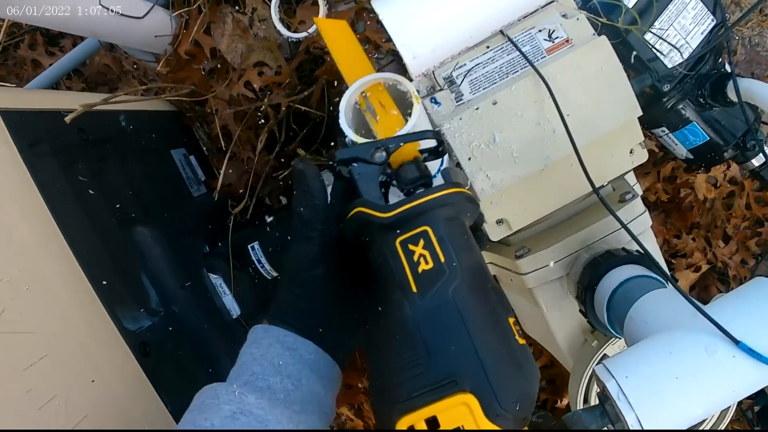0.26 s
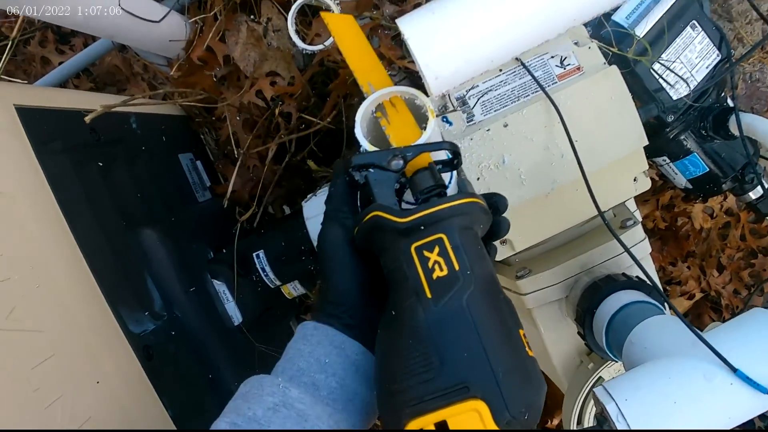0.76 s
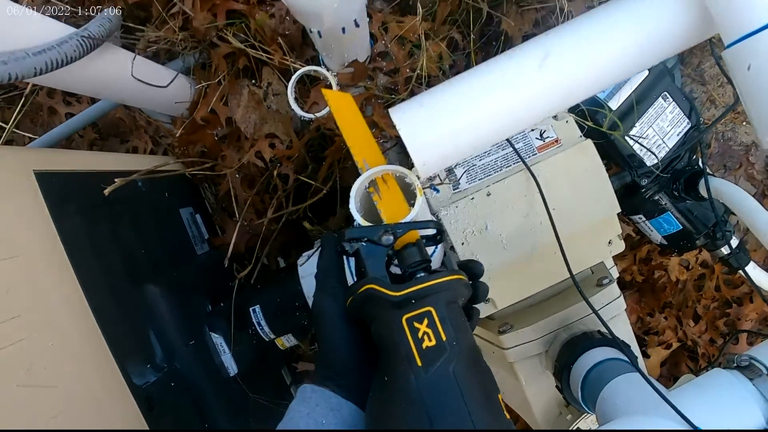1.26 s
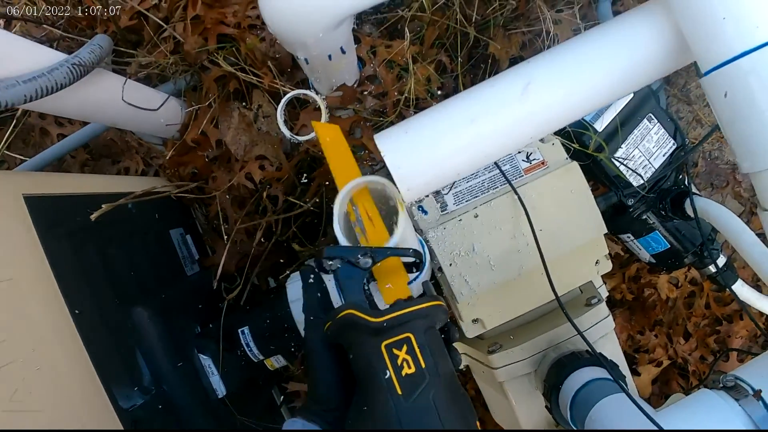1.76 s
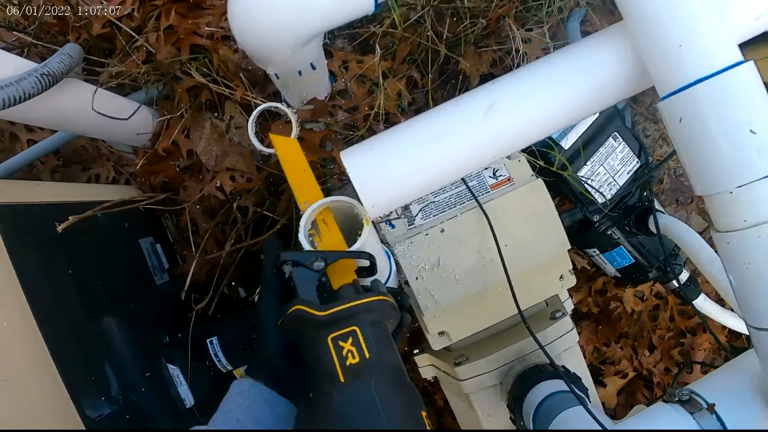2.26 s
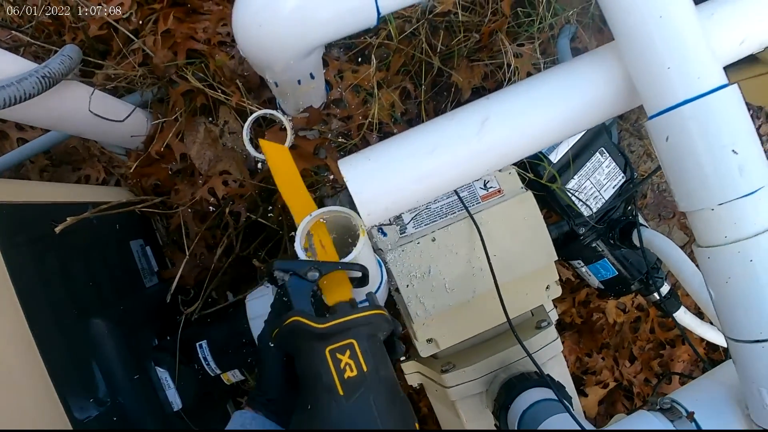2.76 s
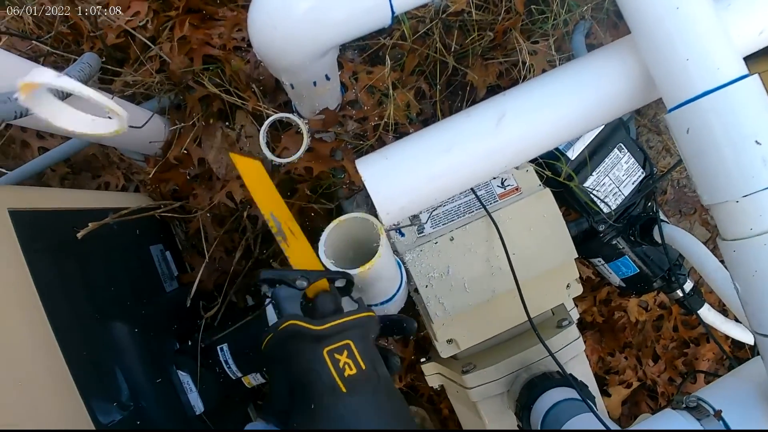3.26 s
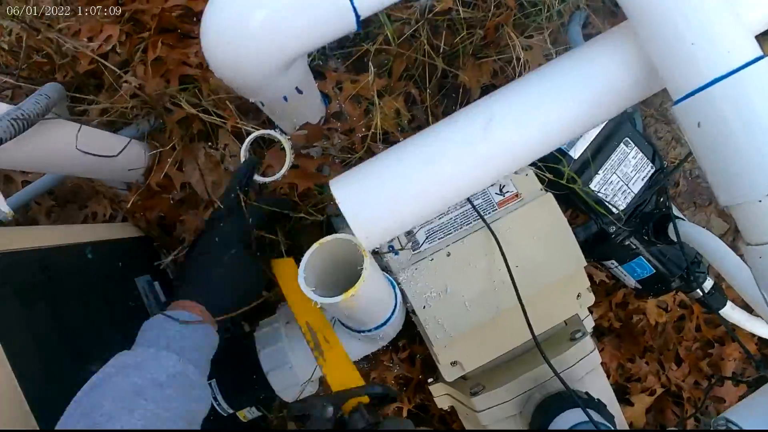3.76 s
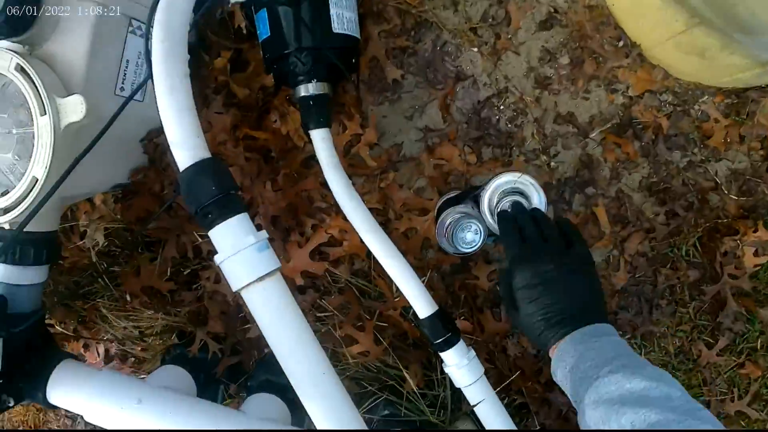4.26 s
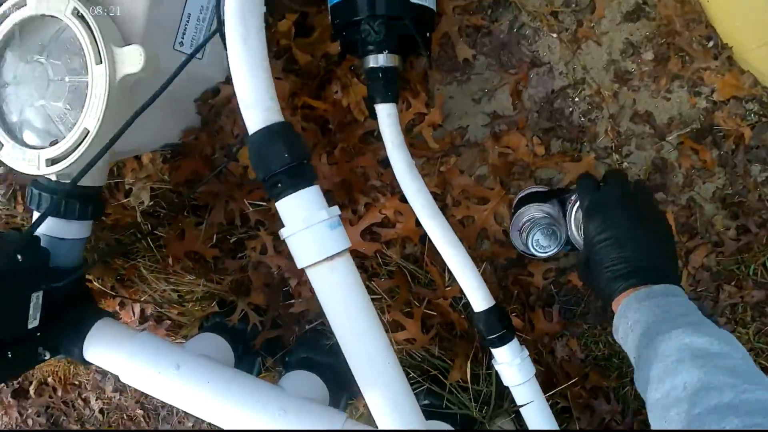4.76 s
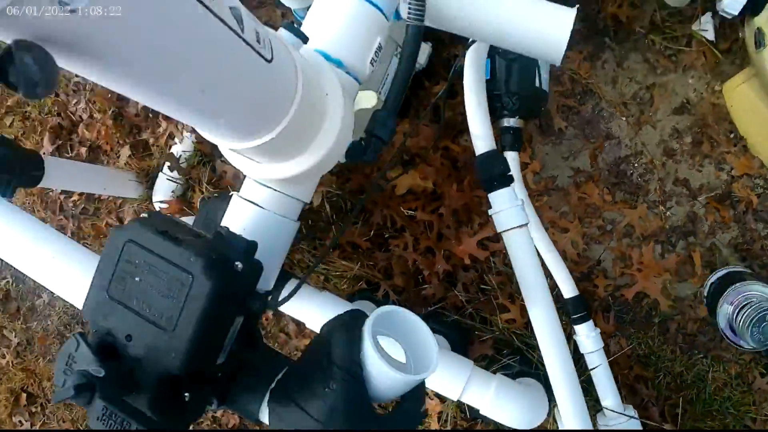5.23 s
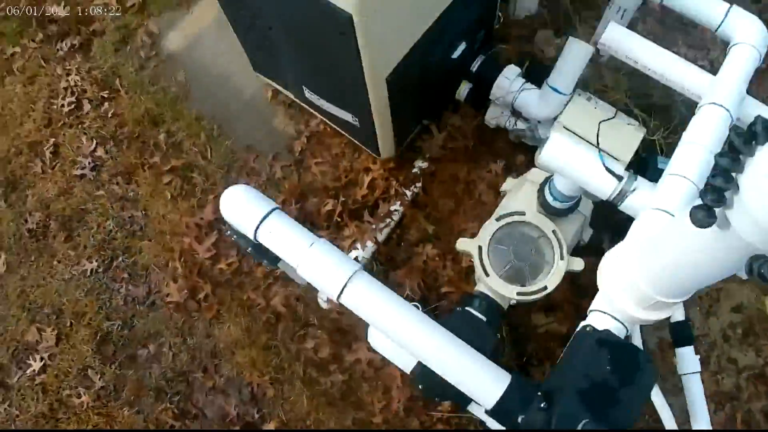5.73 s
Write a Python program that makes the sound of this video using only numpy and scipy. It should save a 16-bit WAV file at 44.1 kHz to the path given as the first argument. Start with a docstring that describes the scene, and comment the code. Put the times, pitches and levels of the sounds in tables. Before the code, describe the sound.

Close outdoor pickup of a cordless reciprocating saw on plastic pipe. It buzzes already running, winds down with clicks and taps, pauses, then cuts in two loud rattling bursts. The freed blade whines and spins down. Quiet air, faint leaf rustle and low microphone bumps follow, ending in a hollow plastic thump.

```python
"""A cordless reciprocating saw, close by outdoors, works through an upright plastic pipe.
One crank angle times the blade, gears and carrier: coloured noise for cutting, tones for whine, hum and motor.
The saw skims and stops, is set down again, bites and slams the pipe at each reversal, breaks through, spins down.
Noise bursts and decaying modes make scrapes, taps and a late hollow thump; noise swells make low bumps and slides.
Rumble, a distant hush and a faint rustle of leaves lie beneath, and nearby surfaces return a short, dull echo."""
import sys
import numpy as np
from scipy import signal
from scipy.fft import rfft, irfft, next_fast_len
from scipy.io import wavfile
from scipy.ndimage import uniform_filter1d

SR = 44100
rng = np.random.default_rng(int(sys.argv[2]) if len(sys.argv) > 2 else 0)


def output_pcm(signal):
    """Save a mono or channel-first signal as 16-bit PCM at the path in sys.argv[1].

    Samples are clipped to [-1, 1] before scaling.
    """
    pcm = np.clip(np.atleast_2d(signal).T, -1, 1) * 32767
    wavfile.write(sys.argv[1], SR, np.round(pcm).astype(np.int16))


N = 264417
T = np.arange(N) / SR
SIZE = next_fast_len(N + SR // 2)
HZ = np.maximum(np.arange(SIZE // 2 + 1) * SR / SIZE, 1)

# All levels are relative: filters and the mix scale them further.
# crank speed in each of three runs: (time [s], speed [strokes per s])
CRANK_SPEED = [
    [(0, 25.6), (.34, 25.4), (.47, 26.1), (.55, 25.4), (.6, 19), (.7, 12)],
    [(1.65, 4), (1.77, 17.08), (1.89, 15.75), (1.97, 23.02), (2.08, 24.27), (2.42, 24.85), (2.52, 10.9)],
    [(2.67, 4), (2.78, 7.24), (2.88, 16.78), (2.95, 22.62), (3.1, 25.2), (3.46, 25.1), (3.53, 26.7),
     (3.72, 26.7), (3.75, 20.6), (3.8, 19), (3.89, 11)],
]
# a moment in each run at which the blade starts to pull: time [s]
PULL_START = [0, 1.8044, 2.779]
# blade skimming the pipe: (time [s], level [dB])
SKIM_LEVEL = [(0.0, -23), (0.364, -23.5), (0.686, -35.5), (0.74, -97)]
# cutting effort in each of two deep cuts: (time [s], level [dB])
CUT_EFFORT = [
    [(1.66, -54), (1.8, -25), (1.97, -15), (2.08, -18), (2.33, -15.5), (2.42, -22), (2.485, -19),
     (2.55, -50)],
    [(2.66, -53), (2.78, -23), (2.945, -17), (2.972, -25), (3.0, -19.5), (3.16, -18.5), (3.3, -20),
     (3.47, -18), (3.5, -27.5)],
]
# blade running free: (time [s], level [dB])
FREE_LEVEL = [(3.48, -13), (3.492, -22), (3.716, -22.5), (3.85, -31), (3.866, -24), (3.884, -31),
              (3.93, -104.5)]
# gear whine under light load: (start [s], end [s], level at top speed [dB], roughness [0-1])
GEAR_WHINE = [(0, .69, -32, 0.2), (3.098, 3.49, -36.5, .55), (3.496, 3.723, -27.5, .05),
              (3.745, 3.887, -28.5, .3)]
# hum of the blade carrier: (multiple of stroke rate [1], level [dB])
CARRIER_HUM = [(2, -20.5), (3, -31.5), (6, -23.5), (10, -17), (14, -18.5), (17, -15.5)]
# motor tone in each run: (time [s], frequency [Hz], level [dB])
MOTOR_TONE = [
    [(1.76, 6200, -60), (1.785, 7200, -43), (1.82, 9000, -52)],
    [(2.715, 6300, -58), (2.745, 7700, -51), (2.775, 9100, -40)],
    [(3.48, 7300, -48), (3.54, 7440, -41), (3.69, 7500, -42), (3.74, 6800, -46), (3.77, 6280, -32.5),
     (3.81, 5960, -48)],
]
# slow or still blade scraping in the cut: (time [s], level [dB], amplitude decay [s])
BLADE_SCRAPES = [(0.678, -29, 0.0079), (0.761, -22, 0.006), (0.802, -33, 0.011), (0.842, -29, 0.01),
                 (0.86, -23.5, 0.0087), (1.435, -57.5, 0.032), (1.641, -39, 0.012), (1.722, -31.5, 0.038),
                 (2.666, -39.5, .005), (2.682, -35.5, 0.019), (2.729, -29, .0055), (2.827, -11.5, 0.0047),
                 (2.868, -15.5, .005), (3.965, -48.5, 0.013)]
# taps and clicks that ring the pipe: (time [s], wall level [dB], air column level [dB])
SHOE_TAPS = [(.764, -34.5, -39), (.844, -24, -37), (.874, -10.5, -30.5), (.922, -24, -35),
             (.951, -32.5, -37.5), (1.130, -28.5, -46), (1.2565, -31, -54), (1.777, -9, -48.5),
             (2.548, -28.5, -35), (2.575, -22.5, -36.5), (2.596, -25.5, -39.5), (2.766, -18.5, -46.5),
             (2.83, -10, -43.5), (2.869, -15, -45.5)]
# modes of the pipe wall: (frequency [Hz], level [dB], t60 [s])
WALL_MODES = [(728, -2, 0.022), (900, -6.5, 0.029), (1240, -2.5, 0.012), (1594, -3.5, 0.013),
              (1720, -3.5, 0.0087), (3180, -28.5, 0.0049)]
# modes of the air column: (frequency [Hz], level [dB], t60 [s])
COLUMN_MODES = [(287, 1, 0.04), (557, 1, 0.079)]
# dull low bumps, mostly wind and handling on the microphone, at 1.966 s a low thud of the slamming saw: (time
# [s], level [dB], Gaussian spread [s])
LOW_BUMPS = [(.85, -44, 0.075), (1.17, -49, 0.0096), (1.966, -33, 0.05), (4.08, -50, 0.022),
             (4.168, -41.5, 0.027), (4.3, -50, 0.081), (4.575, -42.5, .014), (4.828, -40.5, 0.0098),
             (4.917, -39.5, 0.054), (5.139, -46, .042), (5.48, -41, .024), (5.572, -44, 0.067)]
# gloved hand sliding the fittings: (time [s], level [dB], Gaussian spread [s])
HAND_SLIDES = [(4.419, -65, 0.011), (4.647, -77.5, 0.19), (5.014, -51.5, 0.0086)]
# modes of the hollow body: (frequency [Hz], level [dB], t60 [s])
HOLLOW_MODES = [(147.4, -3.5, 0.2), (276, -5.5, 0.11), (349, -9, 0.16), (386, -4, 0.12), (573, -3.5, 0.02),
                (724, -6, 0.053), (900, -5, 0.011), (1324, -19, 0.063), (1660, -24, 0.056)]
# hush and leaf rustle outdoors, two stretches: (time [s], hush [dB], rustle [dB])
OUTDOOR_AIR = [
    [(0.98, -68, -86), (1.21, -69.5, -94), (1.428, -66, -89), (1.6, -64.5, -87)],
    [(3.95, -61.5, -75.5), (4.078, -54.5, -91), (4.772, -54.5, -84.5), (5.88, -52.5, -77)],
]
# low rumble of air on the microphone: (time [s], level [dB])
RUMBLE_LEVEL = [(1, -53.5), (1.6, -59), (4.1, -54), (5.9, -50)]

# noise spectra, rescaled to unit power: (frequency [Hz], density [dB per Hz])
SKIM_SPECTRUM = [(24, -28), (40, -11), (124, -18.5), (422, -2.5), (479, -6.5), (1020, -14), (1210, -4),
                 (2770, -10.5), (3300, -4), (3830, -17.5), (7540, -14.5), (8990, -13), (10700, -21),
                 (14100, -22), (16000, -36)]
CUT_SPECTRUM = [(35, -64), (60, -26.5), (133, -8.5), (172, -23), (217, -3), (437, -2), (607, -7.5),
                (1510, 1), (2710, -16), (4750, -19), (7570, -14), (8320, -17.5), (9790, -24),
                (11300, -32.5), (16000, -38.5)]
SLAM_SPECTRUM = [(35, -54.5), (60, -44.5), (172, -17), (217, -9), (448, -12), (607, -14), (1250, -1),
                 (1950, -5.5), (2710, -16), (4220, -17.5), (7570, -14), (8320, -15.5), (9790, -22),
                 (11300, -32.5), (16000, -48.5)]
FREE_SPECTRUM = [(24, -30.5), (40, -11.5), (185, -16.5), (479, -8), (715, -10), (942, 1.5), (1340, 2),
                 (2910, -15.5), (3380, -7.5), (3740, -15), (6170, -10.5), (8550, -11), (11300, -29),
                 (13800, -26), (16000, -48.5)]
SCRAPE_SPECTRUM = [(200, 2), (1000, 7.5), (3500, -3.5), (6000, -5), (9500, -8), (11500, -17.5),
                   (16000, -21)]
BUMP_SPECTRUM = [(10, -25), (30, -11.5), (55, 1), (90, 1), (200, -2), (350, -13), (600, -22.5),
                 (2000, -51.5), (8000, -84.5), (16000, -80)]
SLIDE_SPECTRUM = [(1000, -23), (2800, -16), (4000, 2), (6500, -7), (9500, -3), (13500, -5), (16000, -6.5)]
CRACK_SPECTRUM = [(200, 4), (1000, 5.5), (2300, -10), (3500, 4), (5700, -5), (8000, -10.5), (11000, -7),
                  (16000, -26)]
CLATTER_SPECTRUM = [(40, -21.5), (130, 1.5), (300, -5.5), (650, -8), (1000, -20.5), (1700, -25.5),
                    (3500, -30.5), (7000, -38), (16000, -56.5)]
RUMBLE_SPECTRUM = [(10, -40.5), (28, -18.0), (55, 6.5), (110, -3.0), (250, -10.5), (1000, -41.0),
                   (16000, -100)]
HUSH_SPECTRUM = [(60, -9.5), (300, -3.0), (900, -1.5), (1700, -10.0), (2600, -28.0), (6000, -53),
                 (16000, -71.0)]
RUSTLE_SPECTRUM = [(800, -22.5), (2500, -7.5), (3900, -2.5), (5400, -7.0), (9500, -6.5),
                   (11300, -15.5), (13500, -8.0), (16000, -19)]
# narrow peaks of saw and pipe, and dips of the microphone: (frequency [Hz], width [Hz], level [dB])
PEAKS_AND_DIPS = [(452, 23, 4.5), (1320, 79, 2), (1490, 140, 3), (1720, 43, 0), (1880, 130, 1),
                  (2970, 160, -1), (4120, 200, 3.5), (4900, 480, 4), (5387, 220, -6.5), (6090, 200, 2.5),
                  (7665, 460, -6), (8270, 180, 4), (9500, 700, 3), (11100, 730, -8.5)]
# response of the gear housing: (frequency [Hz], level [dB])
HOUSING_RESPONSE = [(1200, -23), (1900, 0.5), (2250, -11.5), (2480, 4.5), (2800, -15.5), (3150, 1.5),
                    (3350, -0.5), (3550, -2.5), (3900, -18.5), (7000, -7), (10000, -18.5)]
# left minus right for saw and pipe: (frequency [Hz], level [dB])
SAW_LEAN = [(60, -5.5), (250, 4), (600, 7), (1200, 6), (2200, 3), (4200, 8), (8000, 14.5), (12000, -3)]
# left-right correlation, before limiting, while skimming: (frequency [Hz], correlation [1])
SKIM_CORRELATION = [(60, -0.18), (350, -0.63), (600, -1), (900, -0.37), (1200, -1.1), (1650, -2.5),
                    (2400, 1), (3800, -0.67), (8000, 0.98), (10800, -1.5), (13000, .85)]
# and for all other contacts of saw and pipe: (frequency [Hz], correlation [1])
CUT_CORRELATION = [(60, 0.37), (400, 0.67), (540, -0.13), (900, 0.54), (1400, 0.94), (2400, -0.78),
                   (4000, -0.38), (6000, 0.68), (8500, 0.23), (10800, -.5), (13000, .85)]

GEAR_TEETH = 131  # whine cycles per crank turn
WHINE_DB_PER_OCTAVE = 6  # the whine sinks with the crank speed
BRAKING_PER_S2, BACKLASH = 70, 0.97  # full braking (strokes per s lost each s) and roughness it adds
RIPPLE_DB, RIPPLE_HZ = 4, 59.97  # depth and spacing of the small modes of blade and housing
TEETH_DB, SLAM_DB = -5.5, 10.5  # relative to the effort
PULL_DB, SLAM_SPREAD_DB = 2.5, 1.34  # lead of pull over push; chance range either way
SLAM_DB_PER_OCTAVE = 2  # a faster blade slams harder
TICK_DB, TICK_S = -20, 0.002  # bright tick relative to its tap, and its decay
THUMP_S, THUMP_DB = 5.9135, -13
GUST_DB, GUSTS_PER_S = 1.8, 4.5


def from_db(db):
    """Logarithmic level: decibels become an amplitude ratio."""
    return 10 ** (np.asarray(db) / 20)


def rms_one(x):
    """Power normalisation: scale to unit mean square."""
    return x / np.sqrt(np.mean(x ** 2) + 1e-20)


def in_time(rows):
    """Linear interpolation: a curve at every sample."""
    return np.interp(T, *np.transpose(rows))


def level(rows):
    """Envelope: smoothed gain from a dB curve, practically silent outside it."""
    db = np.interp(T, *np.transpose(rows), left=-140, right=-140)
    return uniform_filter1d(from_db(db), size=200)


def at_hz(points):
    """Logarithmic frequency interpolation: a curve at every spectral bin."""
    hz, value = np.transpose(points)
    return np.interp(np.log(HZ), np.log(hz), value)


def colour(x, db):
    """Minimum-phase filtering: causal colour that keeps the power of white noise."""
    cepstrum = irfft(np.log(rms_one(from_db(db))), SIZE)
    # folding the cepstrum onto positive time makes the response causal
    cepstrum[1:SIZE // 2] *= 2
    cepstrum[SIZE // 2 + 1:] = 0
    response = np.exp(rfft(cepstrum))
    return irfft(rfft(x, SIZE) * response, SIZE)[..., :N]


def noise():
    """Incoherence: two unrelated white noises."""
    return rng.standard_normal((2, N))


def drift(rate):
    """Random modulation: straight lines join chance values of unit spread, rate per second."""
    knots = rng.standard_normal(4000)
    return np.interp(T * rate, np.arange(len(knots)), knots)


def ring(clicks, modes, spread_db):
    """Modal superposition: clicks excite decaying resonances, each with a chance strength."""
    out, at = np.zeros(N), np.flatnonzero(clicks)
    for k, (hz, db, t60) in enumerate(modes):
        radius, angle = from_db(-60 / (t60 * SR)), 2 * np.pi * hz / SR
        force = np.full(N, 1e-18)  # inaudible floor
        force[at] = clicks[at] * from_db(db + spread_db * rng.standard_normal(len(at)))
        poles = [1, -2 * radius * np.cos(angle), radius * radius]
        out += (-1) ** k * signal.lfilter([0, np.sin(angle)], poles, force)
    return out


def add(track, s, gain, decay_s):
    """Exponential decay: add a sudden burst of power; decay_s is that of its amplitude."""
    i = int(s * SR)
    age = T[:min(N - i, SR // 4)]
    track[i:i + len(age)] += gain ** 2 * np.exp(-2 * age / decay_s)


def pair(x, alike, lean_db):
    """Stereo coherence: two noises become left and right; their middle keeps its power."""
    alike = np.clip(alike, -.9, .99)
    side, sign = np.sqrt((1 - alike) / (1 + alike)), np.array([[1], [-1]])
    lean = np.tanh(np.log(from_db(lean_db)) / 2)
    spread = x[0] + sign * side * x[1]
    return spread * (1 + sign * lean) / np.sqrt(1 + (side * lean) ** 2)


def crank():
    """Rotational kinematics: speed integrates to turns; whole turns start a pull, half turns a push."""
    speed = in_time(np.vstack(CRANK_SPEED))
    turns = np.cumsum(speed) / SR
    for run, pull_s in zip(CRANK_SPEED, PULL_START):
        turns = turns - np.interp(pull_s, T, turns) % 1 * (T >= run[0][0])
    return speed, turns


def drive(speed, turns, repeat, throb_db, grain_db):
    """Periodic contact: part of the noise returns each stroke; throb shapes its level after reversals."""
    stroke = rng.standard_normal((2, SR // 25))
    returning = stroke[:, (turns % 1 * stroke.shape[1]).astype(int)]
    contacts = np.sqrt(repeat) * returning + np.sqrt(1 - repeat) * noise()
    jolt = (speed / speed.max()) ** 2  # the blade's inertia force grows with the square of its speed
    swell_db = throb_db * jolt * (np.exp(-(2 * turns % 1) / 0.38) - .5)
    return rms_one(contacts * from_db(swell_db + grain_db * drift(900)))


def through_saw(force, tone, likeness, lean_db):
    """Transmission: saw, pipe and microphone colour a force, mostly stronger on the left."""
    body_db = sum(db * np.exp(-((HZ - hz) / width) ** 2) for hz, width, db in PEAKS_AND_DIPS)
    # countless small modes of blade and housing ripple the treble
    ripple = np.interp(HZ / RIPPLE_HZ, np.arange(1000), rng.standard_normal(1000))
    ripple = ripple * HZ / (HZ + 1200)
    coloured = colour(force, at_hz(tone) + body_db + RIPPLE_DB * ripple)
    sound = pair(rfft(coloured, SIZE), at_hz(likeness), at_hz(SAW_LEAN) + lean_db)
    return irfft(sound, SIZE)[:, :N]


def gears(speed, turns, flutter, octave_db, fringe_db, slip):
    """Gear meshing: tooth contacts whine through the housing; braking makes them chatter in backlash."""
    gain, rough = np.zeros((2, N))
    for start, end, db, roughness in GEAR_WHINE:
        during = (T >= start) & (T < end)
        gain[during], rough[during] = from_db(db), roughness
    braking = np.clip(-np.gradient(speed) * SR / BRAKING_PER_S2, 0, 1)
    gain, rough = uniform_filter1d([gain, rough + BACKLASH * braking], size=900)
    gain = gain * from_db(WHINE_DB_PER_OCTAVE * np.log2(speed / speed.max()))
    phase = 2 * np.pi * GEAR_TEETH * turns
    phase = phase + flutter * np.sin(4 * np.pi * turns) + slip * rough * drift(700)
    # random modulation widens the whine into a fringe
    fringe = from_db(fringe_db) * (drift(450) * np.sin(phase) + drift(450) * np.cos(phase))
    octave = from_db(octave_db) * np.sin(2 * phase)
    whine = gain * rms_one(np.sin(phase) + fringe + octave)
    housed = irfft(rfft(whine, SIZE) * from_db(at_hz(HOUSING_RESPONSE)), SIZE)[:N]
    return housed * from_db([[4], [-7]])


def shake(turns):
    """Harmonic radiation: the swinging blade carrier hums on multiples of the stroke rate."""
    hum = sum(from_db(db) * np.sin(2 * np.pi * (k * turns + rng.random())) for k, db in CARRIER_HUM)
    return level(SKIM_LEVEL) * hum * from_db([[1.5], [-1.5]])


def yard(x, echo_db, t60):
    """Diffuse reflection: pipes and housings nearby scatter a short, dull echo."""
    age = T[:SR // 2]
    scatter = rng.standard_normal((2, len(age))) * from_db(-60 * age / t60) * (age > .006)
    scatter = signal.sosfilt(signal.butter(1, 2500, fs=SR, output="sos"), scatter)
    scatter /= np.sqrt(np.sum(scatter ** 2, axis=1, keepdims=True))
    return x + from_db(echo_db) * signal.fftconvolve(x, scatter, axes=1)[:, :N]


def air(hush_db, rustle_db):
    """Broadband ambience: low rumble, a distant hush and a faint rustle of dry leaves."""
    s, *columns = np.vstack(OUTDOOR_AIR).T
    hush, rustle = [from_db(np.interp(T, s, db)) for db in columns]
    rumble = from_db(in_time(RUMBLE_LEVEL) + GUST_DB * drift(GUSTS_PER_S))
    rumble = rumble * colour(noise(), at_hz(RUMBLE_SPECTRUM))
    hush = hush * colour(noise(), at_hz(HUSH_SPECTRUM))
    rustle = rustle * colour(noise() * from_db(1.7 * drift(380)), at_hz(RUSTLE_SPECTRUM))
    return (pair(rumble, alike=.1, lean_db=2.0)
            + from_db(hush_db) * pair(hush, alike=-0.5, lean_db=3.0)
            + from_db(rustle_db) * pair(rustle, alike=.1, lean_db=4.5))


def handling(scrape_db, tap_db, tail_db):
    """Friction and impact: teeth scrape grittily; taps ring the pipe wall and the air in it."""
    power, wall, column = np.zeros((3, N))
    for s, db, decay_s in BLADE_SCRAPES:
        add(power, s, from_db(db + scrape_db), decay_s)
        add(power, s, from_db(db + tail_db), .03)  # faint longer tail
    for s, db, air_db in SHOE_TAPS:
        add(power, s, from_db(db + tap_db + TICK_DB), TICK_S)
        wall[int(s * SR)], column[int(s * SR)] = from_db([db + tap_db, air_db])
    envelope = np.sqrt(uniform_filter1d(power, size=90).clip(0))
    grit = envelope * noise() * from_db(7.2 * drift(1000))
    pipe = ring(wall, WALL_MODES, spread_db=3.0) + ring(column, COLUMN_MODES, spread_db=2.5)
    scraped = through_saw(grit, SCRAPE_SPECTRUM, CUT_CORRELATION, lean_db=-2)
    return scraped + pipe * from_db([[2], [-2]])


def swells(rows):
    """Gaussian envelope: each event rises and falls about its time."""
    return sum(from_db(db) * np.exp(-.5 * ((T - s) / length) ** 2) for s, db, length in rows)


def bumps():
    """Low-frequency pressure: dull low bumps of noise, mostly from wind and handling on the microphone."""
    dull = colour(noise(), at_hz(BUMP_SPECTRUM))
    return pair(dull, alike=-0.51, lean_db=6) * swells(LOW_BUMPS)


def slams(speed, turns, effort, crack_s, ring_s, ring_db, rebound_db, dull_hz):
    """Repeated impact: at reversals the pipe slams the shoe with a crack, a rebound and a duller rattle."""
    crack, rattle = np.zeros((2, N))
    reversals = np.flatnonzero(np.diff(np.floor(2 * turns)) > 0) + 1
    reversals = reversals[T[reversals] < FREE_LEVEL[0][0]]  # none once the blade is through
    for i, (delay, size, luck) in zip(reversals, rng.random((len(reversals), 3))):
        pulling = turns[i] % 1 < .5
        swing_db = SLAM_DB_PER_OCTAVE * np.log2(speed[i] / speed.max())
        chance_db = SLAM_SPREAD_DB * (2 * luck - 1)
        force = effort[i] * from_db(swing_db + PULL_DB * (pulling - .5) + chance_db)
        add(crack, T[i], force, crack_s)
        add(crack, T[i] + .0007 + 0.0044 * delay, force * from_db(rebound_db) * size, crack_s)
        add(rattle, T[i] + 0.0011, force * from_db(ring_db), ring_s)
    lowpass = signal.butter(1, dull_hz, fs=SR, output="sos")
    dull = signal.sosfilt(lowpass, np.sqrt(rattle) * noise())
    impacts = np.sqrt(crack) * noise() + dull
    return from_db(SLAM_DB) * through_saw(impacts, SLAM_SPECTRUM, CUT_CORRELATION, lean_db=-0.5)


def motor(waver, motor_db):
    """Frequency modulation: the brushless motor sings a thin, unsteady tone."""
    out = 0
    for rows in map(np.array, MOTOR_TONE):
        phase = 2 * np.pi * np.cumsum(in_time(rows[:, :2])) / SR
        out = out + level(rows[:, ::2]) * np.sin(phase + waver * drift(500))
    return from_db(motor_db) * out * from_db([[3], [-5]])


def fittings():
    """Sliding friction: glove and fittings give brief, bright hisses."""
    hiss = colour(noise(), at_hz(SLIDE_SPECTRUM))
    return pair(hiss, alike=0.19, lean_db=-1) * swells(HAND_SLIDES)


def thump(crack_db, clatter_db, clatter_s, lag):
    """Dispersion: a hard contact rings a big hollow plastic body; its low bending waves arrive last."""
    clicks, crack, clatter = np.zeros((3, N))
    clicks[int(THUMP_S * SR)] = from_db(THUMP_DB)
    add(crack, THUMP_S, from_db(crack_db), .002)
    add(clatter, THUMP_S, from_db(clatter_db), clatter_s)
    rough = colour(np.sqrt(crack) * noise(), at_hz(CRACK_SPECTRUM))
    rough = rough + colour(np.sqrt(clatter) * noise(), at_hz(CLATTER_SPECTRUM))
    # an all-pass delays the bass
    pole = np.exp(-1 / (lag * SR))
    boom = signal.lfilter([-pole, 1], [1, -pole], ring(clicks, HOLLOW_MODES, spread_db=1.0))
    return boom * from_db([[.8], [-.8]]) + pair(rough, alike=0.11, lean_db=1.5)


def scene():
    """Superposition: one crank angle times the blade, gears and carrier; one effort sets teeth and slams."""
    speed, turns = crank()
    effort = sum(map(level, CUT_EFFORT))
    skim = level(SKIM_LEVEL) * drive(speed, turns, repeat=0.4, throb_db=16.0, grain_db=1.0)
    skim = through_saw(skim, SKIM_SPECTRUM, SKIM_CORRELATION, lean_db=1.5)
    bite = effort * drive(speed, turns, repeat=0.16, throb_db=0.0, grain_db=3.0)
    bite = through_saw(bite, CUT_SPECTRUM, CUT_CORRELATION, lean_db=-2.0)
    free = level(FREE_LEVEL) * drive(speed, turns, repeat=.7, throb_db=-1.5, grain_db=2.0)
    free = through_saw(free, FREE_SPECTRUM, CUT_CORRELATION, lean_db=-0.5)
    saw = from_db(-2.5) * skim + from_db(TEETH_DB) * bite + from_db(-3) * free
    saw = saw + gears(speed, turns, flutter=0.34, octave_db=-18, fringe_db=-7.5, slip=1.8)
    saw = saw + shake(turns) + motor(waver=.9, motor_db=5.0)
    saw = saw + slams(speed, turns, effort, crack_s=0.0025, ring_s=0.0077, ring_db=-5.5,
                      rebound_db=-2, dull_hz=3500)
    near = saw + handling(scrape_db=-6, tap_db=-7.5, tail_db=-32.5)
    near = near + thump(crack_db=-21.5, clatter_db=-21, clatter_s=0.021, lag=0.00088)
    around = bumps() + fittings() + air(hush_db=-2.5, rustle_db=7.5)
    return yard(near, echo_db=-22, t60=0.18) + around


def record(dry):
    """Band limiting and saturation: the deepest bass is cut, peaks are rounded, the top is cut."""
    x = signal.sosfilt(signal.butter(3, 36, "high", fs=SR, output="sos"), dry)
    rounded = .95 * np.tanh(x / .95)
    return signal.sosfilt(signal.cheby2(16, 80, 16900, fs=SR, output="sos"), rounded)


dry = scene()
out = record(dry)
output_pcm(out)
```